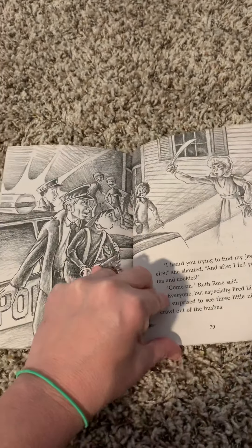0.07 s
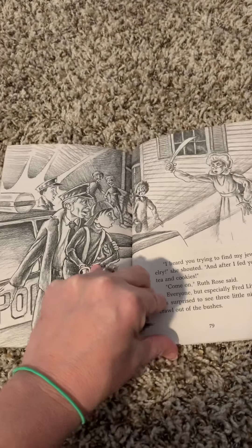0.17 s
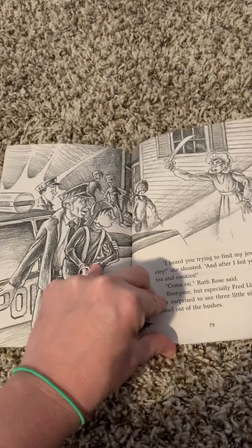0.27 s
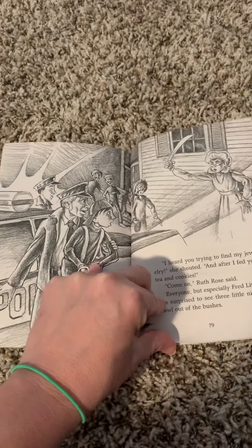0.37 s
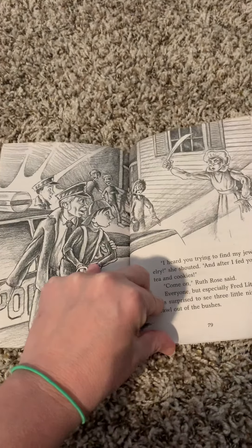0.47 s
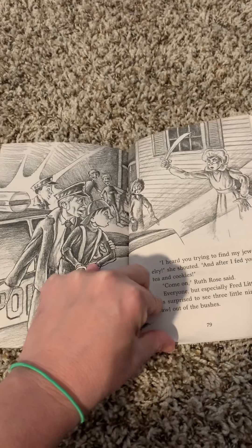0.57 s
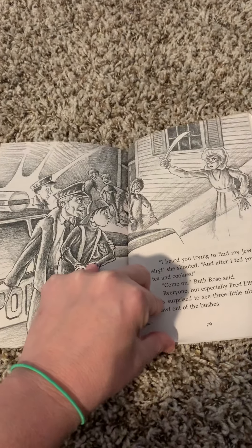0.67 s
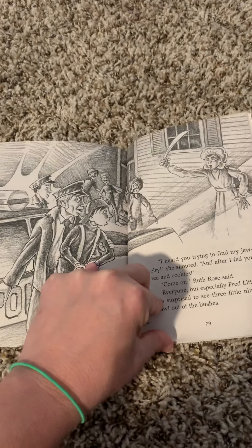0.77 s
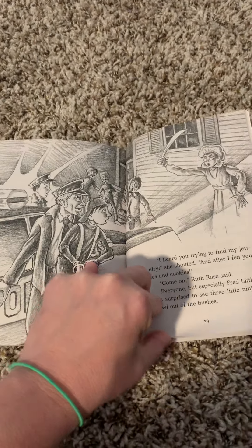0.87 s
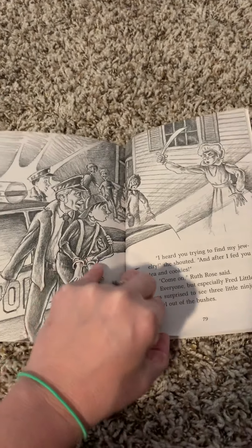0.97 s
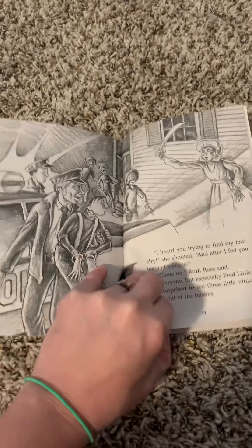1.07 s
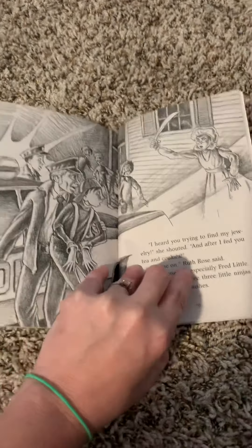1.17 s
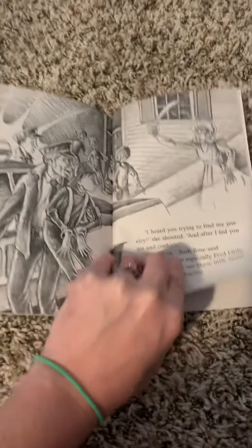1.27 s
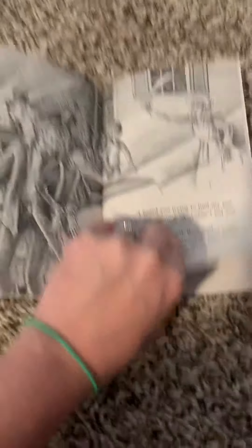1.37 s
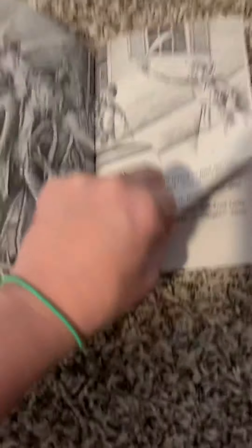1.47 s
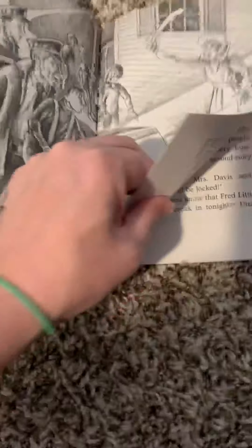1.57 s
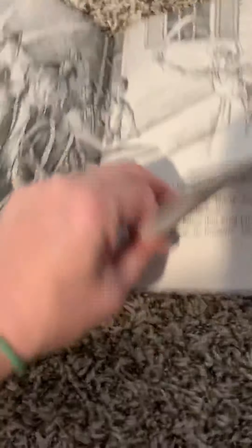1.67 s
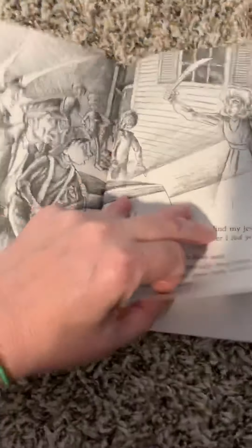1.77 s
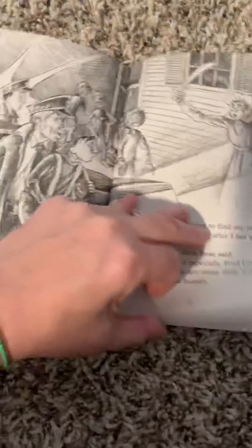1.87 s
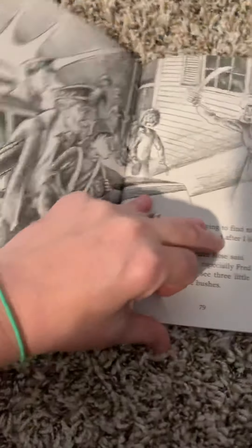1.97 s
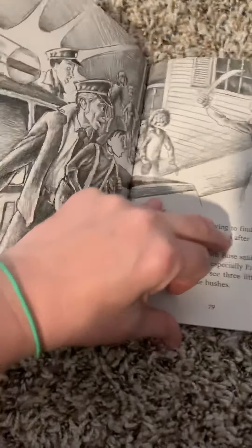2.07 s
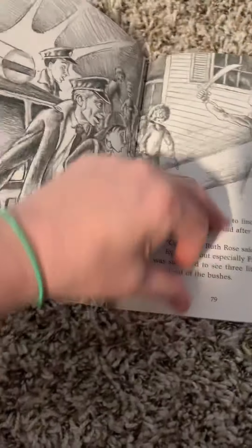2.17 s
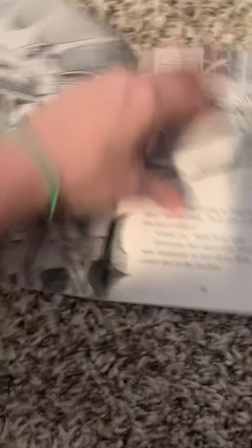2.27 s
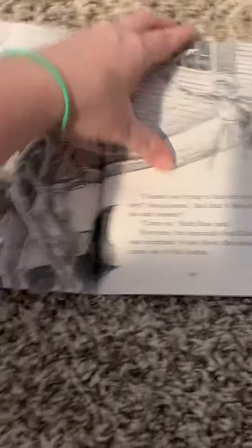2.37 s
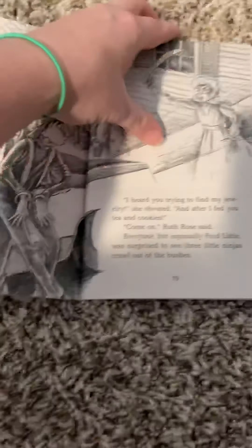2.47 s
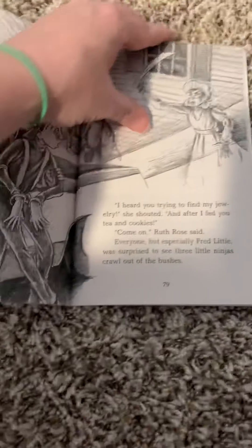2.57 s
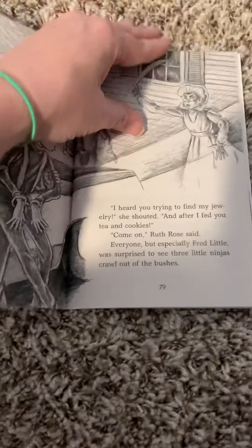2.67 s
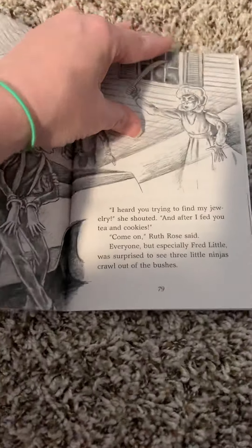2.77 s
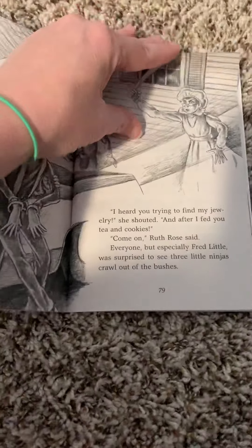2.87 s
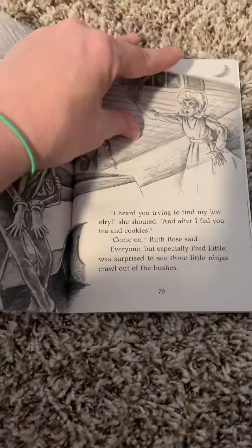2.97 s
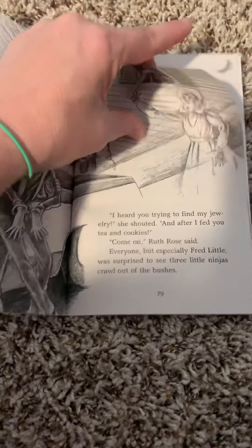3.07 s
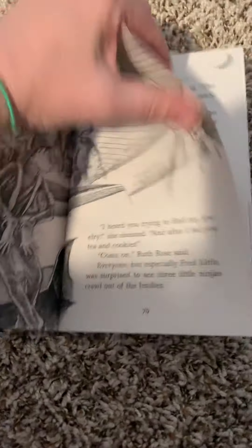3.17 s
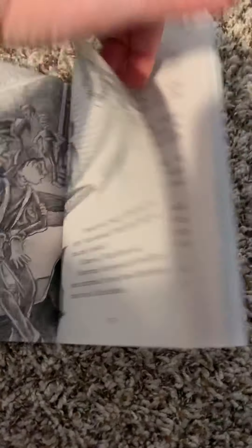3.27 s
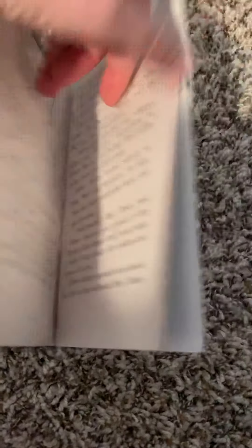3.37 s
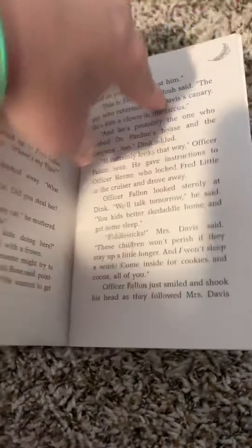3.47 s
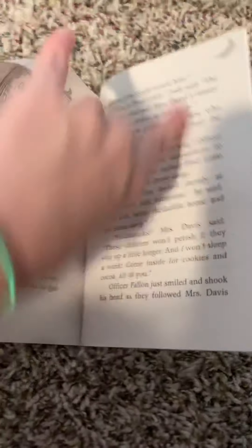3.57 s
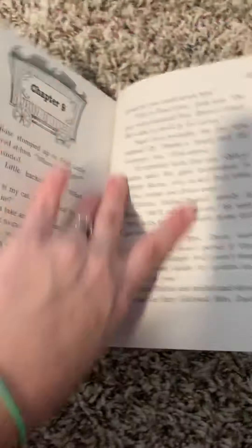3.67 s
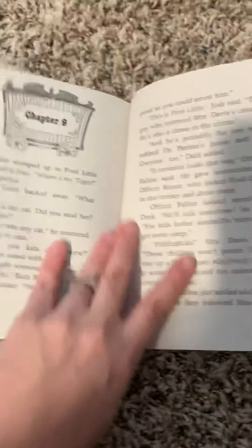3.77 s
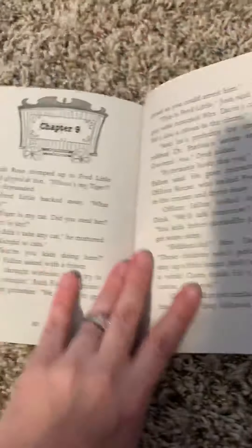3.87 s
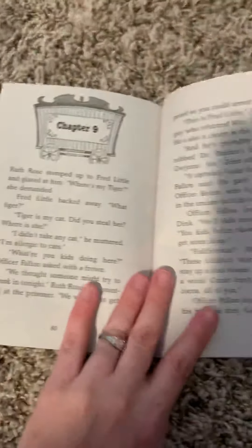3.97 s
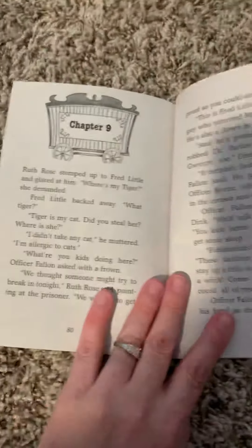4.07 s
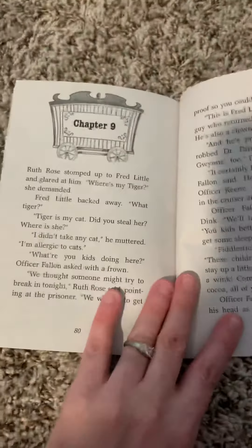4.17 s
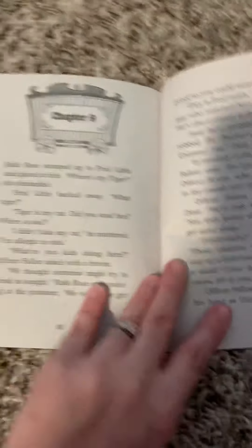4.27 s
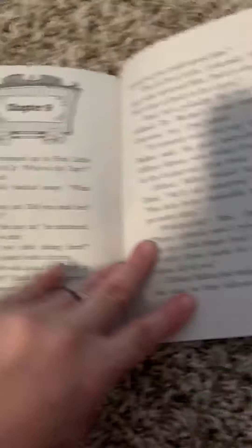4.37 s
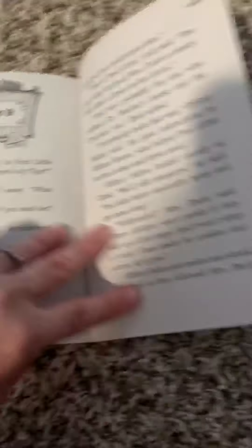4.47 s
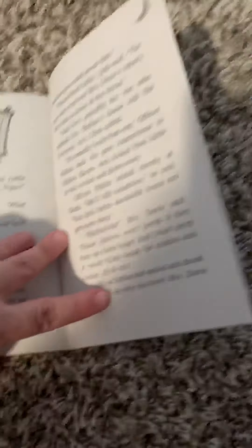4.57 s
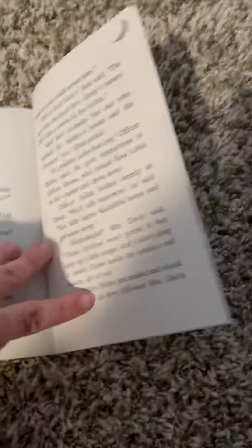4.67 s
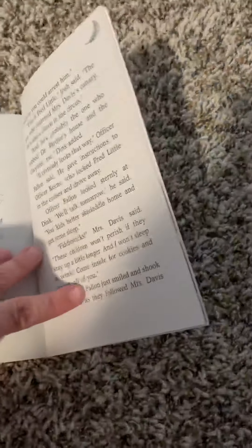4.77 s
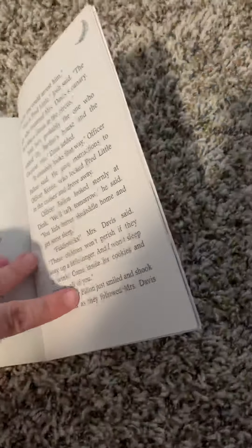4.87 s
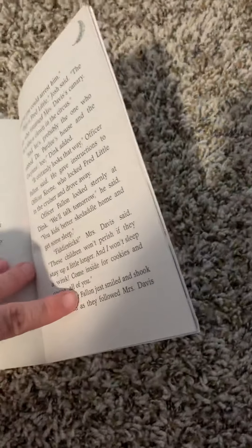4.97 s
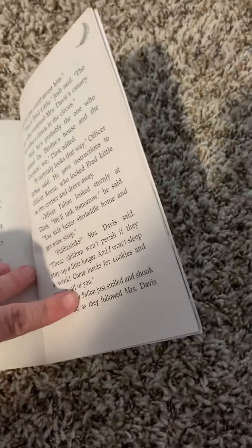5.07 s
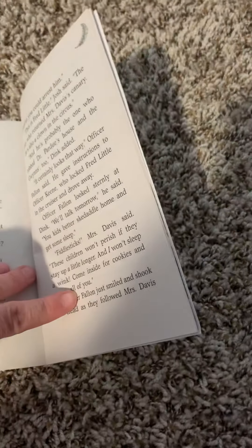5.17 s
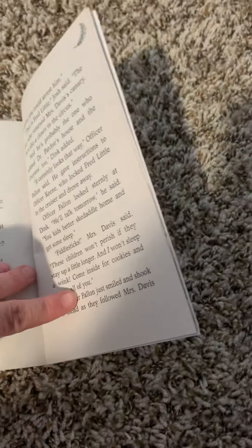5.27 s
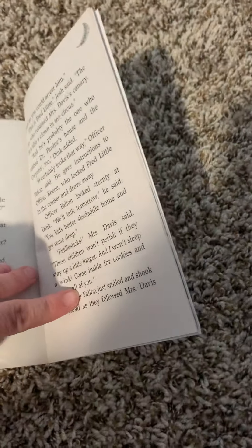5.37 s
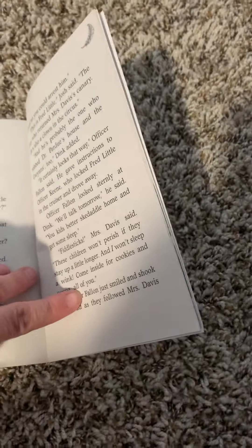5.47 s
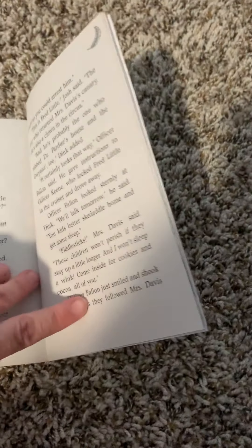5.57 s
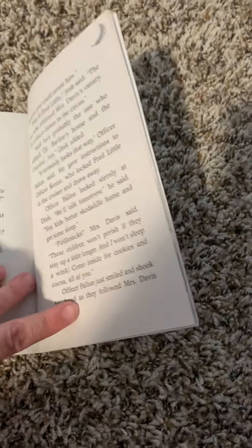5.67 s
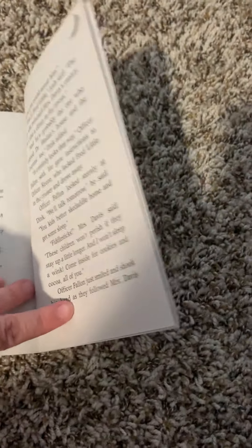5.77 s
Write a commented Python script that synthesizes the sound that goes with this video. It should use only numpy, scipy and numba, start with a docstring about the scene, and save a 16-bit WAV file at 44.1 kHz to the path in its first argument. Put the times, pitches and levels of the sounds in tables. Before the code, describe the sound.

Close, dry handling of a paperback on carpet, nearly mono with slight width, over a very quiet room with faint low rumble. In the first 0.4 s there is soft fingertip hiss and small crackles, with one thin bright tick at about 0.35, then near silence. From 0.9 s rubbing returns, rising through 1.1-1.5 with scratchy rustles, dull pops and a soft bump. Steady papery sliding continues to a hard, sharp snap at about 2.17, followed by a low flap and hissing swish. Brittle ticks come around 2.6. Between 3.1 and 3.25 a page turn crackles densely with sharp snaps, hollow pops and a muffled thump; coarse rustling and air flutter carry on to about 3.8. It then thins, with light brushing at 4.3-4.6 and sparse tiny ticks near 5. A final soft rub with small cracks and pops swells at 5.4-5.8.

```python
"""A paperback handled on a carpet in a quiet, low-rumbling room, heard from close by, mono widened to stereo.
Fingertips hiss softly at first as grains of noise; bending sheets rustle in coarser grains, moved air flutters.
Creases crack as short rough rings, sheets pop as duller ones; after a second the book thumps on the carpet.
The handling is loudest from about 2 to 4 s, with the hardest cracks near 2.17 s, then it gets quieter.
A last rub, with a few cracks and pops, swells between 5.4 and 5.8 s."""
import sys
import numpy as np
from scipy import signal
from scipy.fft import rfft, irfft
from scipy.io import wavfile
from scipy.ndimage import uniform_filter1d
from numba import njit

SR = 44100
rng = np.random.default_rng(int(sys.argv[2]) if len(sys.argv) > 2 else 0)


def transcribe(u):
    """Save the signal u as a 16-bit wav file named by the first command-line argument.

    u: samples, shape (n,) or (channels, n), limited to [-1, 1]; the rate is SR.
    q: integer samples, one column per channel.
    """
    v = np.clip(np.atleast_2d(u).T, -1, 1)
    q = np.round(v * 32767).astype(np.int16)
    wavfile.write(sys.argv[1], SR, q)


N = 256662


def undb(db):
    """Amplitude factor of a level in dB."""
    return 10 ** (np.asarray(db) / 20)


def unit(x):
    """Scale to an RMS of 1."""
    return x / np.sqrt(np.mean(x ** 2))


@njit
def svf(x, hz, width):
    """State-variable band-pass whose centre can move every sample; width is a share of the centre."""
    out, band, low = np.empty(len(x)), 0., 0.
    for i in range(len(x)):
        g = np.tan(np.pi * hz[i] / SR)
        v = (band + g * (x[i] - low)) / (1 + g * (g + width))
        band, low = 2 * v - band, low + 2 * g * v
        out[i] = width * v
    return out


def colour(x, points):
    """Shape the spectrum through (f/Hz, level/dB) points, steeply closed outside them."""
    hz, db = np.transpose(points)
    f = np.arange(N // 2 + 1) * SR / N + 1  # 1 Hz up, so that the log exists
    gain_db = np.interp(np.log(f), np.log(hz), db, -60, -60)
    return irfft(rfft(x) * undb(gain_db), N)


def walk(rate):
    """Wandering level: random values, rate of them per second, each held and then smoothed twice."""
    hold = int(SR / rate)
    steps = np.repeat(rng.standard_normal(N // hold + 1), hold)
    smooth = uniform_filter1d(uniform_filter1d(steps, hold), hold)
    return 0.91 * smooth[:N]


def room():
    """Hush of the room: noise with a low rumble, its level wavering gently."""
    # spectrum of the hush, relative: f/Hz, level/dB per Hz
    hush = [(30, -9), (55, 22), (80, -13), (130, -10.5), (250, -25), (500, -37.5), (1300, -33), (3000, -10),
            (6000, -23.5), (15000, -16)]
    level_db = -77 + 1.5 * walk(3.4)
    return unit(colour(rng.standard_normal(N), hush)) * undb(level_db)


def strokes(column, time_scale, rest_db):
    """Level and tilt of one layer: swells rise and fade evenly in dB; the loudest weighs most in the tilt."""
    # swells of rubbing and bending, some overlapping to shape one longer stroke:
    # peak t/s, rise t/s, fall t/s (before time_scale),
    # level/dB of hiss, rustle, air, then tilt/dB per octave of hiss, rustle
    swells = [(0.0, .1, 0.26, -60, -67, -76, -4.5, -2), (0.096, 0.16, 0.18, -63.5, -60, -67.5, -5, -8.5),
              (0.168, 0.017, 0.11, -65, -57.5, -62, -3, -14),
              (0.204, 0.055, 0.24, -60, -64.5, -66.5, -9.5, 1),
              (0.343, 0.074, 0.059, -53, -60.5, -65, -1.5, -5),
              (0.385, 0.2, 0.066, -70.5, -68.5, -69, -4, 0), (0.58, 0.089, 0.22, -77.5, -91, -74.5, 2, -6),
              (0.862, 0.12, 0.075, -71.5, -67, -72, -11, -5.5),
              (0.941, 0.032, 0.96, -56.5, -62.5, -74, -2, -3),
              (1.066, 0.23, 0.16, -52.5, -64.5, -73, 3.5, -5),
              (1.123, 0.034, 0.063, -45.5, -44, -67.5, -2.5, -4),
              (1.203, .06, 0.11, -58, -57.5, -75, 1, -4.5), (1.263, 0.022, .1, -42.5, -54, -85, 1.5, 1),
              (1.287, 0.036, 0.078, -35.5, -54.5, -85, -3.5, -2.5),
              (1.415, 0.17, 0.095, -38.5, -49, -63, 1, -2.5),
              (1.455, 0.06, 0.16, -40.5, -50.5, -54.5, 0, 2),
              (1.702, 0.33, 0.26, -38, -45.5, -62, -3.5, 5.5), (1.805, 0.32, 0.16, -37, -56.5, -65, 2, -9),
              (1.901, 0.045, 0.081, -40.5, -47, -53, -2, 1), (2.05, 0.25, 0.9, -60, -63.5, -72.5, -10, -1),
              (2.158, 0.039, 0.072, -31, -52, -59.5, -0.5, -8.5),
              (2.266, 0.18, 0.46, -35, -49, -57.5, 6, 0), (2.319, 0.052, 0.11, -100, -70, -53, 15.5, -3),
              (2.619, 0.12, 0.15, -38.5, -50, -60.5, 4.5, 3), (2.7, .2, 0.097, -51.5, -67, -86, 3.5, 9),
              (2.816, 0.043, 0.1, -45.5, -51.5, -59.5, -0.5, -2),
              (2.871, 0.27, 0.036, -50, -59, -69, 2.5, 2), (2.93, 0.02, 0.061, -35, -44.5, -58, -4, 1.5),
              (3.0, 0.19, .4, -55, -66, -74.5, 1, 3), (3.114, 0.061, 0.095, -32, -44, -56.5, -3, 2),
              (3.164, 0.0205, 0.052, -31.5, -40, -53, 1.5, 0.5), (3.188, .03, 0.026, -31, -37.5, -53, 3, 3),
              (3.225, 0.071, 0.084, -28, -37.5, -60, -5, 8.5), (3.31, 0.32, 0.46, -34, -51.5, -57.5, 0, 3),
              (3.458, 0.18, 0.13, -37, -43, -52.5, -6.5, 3), (3.55, 0.17, 0.9, -50, -57.5, -66.5, -5, 7),
              (3.651, 0.075, 0.27, -39, -43.5, -52.5, 2.5, .5),
              (3.752, 0.095, .08, -37, -40.5, -47.5, -0.5, 5.5),
              (3.87, 0.9, 0.24, -43.5, -61.5, -64, 6, -2.5), (4.05, 0.49, 0.11, -57, -70, -78, -2, 0.5),
              (4.22, 0.12, .2, -74.5, -73.5, -72, -3, -4.5),
              (4.3, 0.072, 0.47, -51.5, -60.5, -74, 5.5, -3.5), (4.429, 0.16, 0.28, -43.5, -57, -65, 4, 8),
              (4.516, 0.18, 0.067, -42, -61.5, -88, 8, -2),
              (4.715, 0.13, 0.13, -54, -63.5, -72.5, -0.5, 4.5),
              (4.762, .15, .025, -55.5, -70.5, -77, 0.5, 2.5),
              (4.861, 0.36, 0.49, -62.5, -71.5, -82.5, -5.5, 13),
              (4.974, 0.24, 0.049, -58, -71, -89.5, -0.5, 1),
              (5.117, 0.11, 0.021, -68, -81.5, -80, 5.5, 6.5),
              (5.183, 0.03, 0.039, -59.5, -68, -78, -1.5, 13), (5.237, .02, .06, -63.5, -71, -83, -2, 1),
              (5.37, 0.26, 0.18, -65.5, -70, -99, -4, 8), (5.444, .035, 0.14, -44.5, -55, -76, -2.5, 4),
              (5.49, 0.13, 0.041, -50, -58.5, -78, -2, 0), (5.545, .022, 0.08, -40.5, -48.5, -74, -3, 3.5),
              (5.575, 0.081, 0.02, -43.5, -56, -68, -2, -0.5),
              (5.605, 0.025, 0.053, -52, -55.5, -61, -2, 7), (5.663, .07, 0.2, -49.5, -61.5, -73, 0, 1.5),
              (5.8, 0.14, 0.27, -48, -56.5, -70.5, -1, 2)]
    swell_db = 24  # climbed over the scaled rise, dropped over the scaled fall
    rows = np.array(swells)[:, :, None]
    t = np.arange(0, N / SR, .001)
    after = t - rows[:, 0]
    swell_s = time_scale * np.where(after < 0, rows[:, 1], rows[:, 2])
    power = undb(rows[:, 3 + column] - swell_db * np.abs(after) / swell_s) ** 2
    total = power.sum(axis=0) + undb(rest_db) ** 2
    level_db = 10 * np.log10(total)
    tilt_db = 0 * t  # the air is never tilted
    if column < 2:
        tilt_db = (power * rows[:, 6 + column]).sum(axis=0) / total
    return [np.interp(np.arange(N) / SR, t, curve) for curve in (level_db, tilt_db)]


def patch(x, hz, spacing, flicker_db, rate):
    """One band of grains, cross-faded into its neighbours, whose level flickers on its own."""
    f = np.arange(N // 2 + 1) * SR / N + 1
    away = np.log2(f / hz) / spacing
    fade = np.cos(np.pi / 2 * np.clip(away, -1, 1))
    return unit(irfft(rfft(x) * fade, N)) * undb(flicker_db * walk(rate))


def hopping(x, hz, drift, width, rate):
    """A narrow resonance that hops at random to new pitches, giving the noise a faint changing tone."""
    hops = np.cumsum(rng.random(N) < rate / SR)
    octaves = drift * rng.uniform(-0.92, 1, N)[hops]
    return unit(svf(x, np.minimum(hz * 2 ** octaves, .4 * SR), width))


def rub(level_db, tilt_db, bands, scatter_db, surge_db, patch_db, rate, tone_db):
    """Fibres catch and let go in a dense rain of clicks, a few much bigger, in bands with hopping tones."""
    octaves = np.log2(np.array(bands)[:, 0])
    spacing = np.diff(octaves).max()
    # the bands surge together, but each flickers alone
    sizes = undb(scatter_db * rng.exponential(size=N) + surge_db * walk(2 * rate))
    out, power = 0, 0
    for (hz, db), away in zip(bands, octaves - octaves.mean()):
        gain = undb(db + tilt_db * away)
        grains = sizes * rng.standard_normal(N)
        band = patch(grains, hz, spacing, patch_db, rate)
        tone = hopping(band, hz, drift=0.178, width=0.013, rate=35.)
        out = out + gain * (band + undb(tone_db) * tone)
        power = power + gain ** 2
    # the tilt changes the colour, not the level
    return unit(out / np.sqrt(power)) * undb(level_db)


def fingertips():
    """Skin and page edges drag over the paper: the bright, fine hiss."""
    # usual colour of the sliding hiss: f/Hz, level/dB
    skin = [(2900, -4), (3450, -2), (4110, 1), (4890, 0.9), (5820, 5), (6920, 3.5), (8240, 3.5), (9800, 6),
            (11660, 3.5), (13880, 2.5)]
    level_db, tilt_db = strokes(column=0, time_scale=0.83, rest_db=-86.5)
    return rub(level_db, tilt_db, skin, scatter_db=2.29, surge_db=1.0, patch_db=4.3, rate=35, tone_db=-4)


def sheets():
    """Bending sheets crumple in coarser grains, lower than the hiss."""
    # usual colour of bending sheets: f/Hz, level/dB
    paper = [(480, -5), (600, -1), (760, 3.2), (960, 5.5), (1210, 5), (1520, 7), (1920, 4.5), (2420, 2.5)]
    level_db, tilt_db = strokes(column=1, time_scale=0.81, rest_db=-84)
    return rub(level_db, tilt_db, paper, scatter_db=3.31, surge_db=2.77, patch_db=2.46, rate=35, tone_db=-5)


def air():
    """Low flutter of air pushed by the moving pages."""
    # usual colour of the flutter: f/Hz, level/dB
    puff = [(50, -5.5), (70, -0.5), (100, -1.5), (140, 0), (200, -0.5), (290, 1.86), (410, 0.5)]
    level_db, tilt_db = strokes(column=2, time_scale=0.73, rest_db=-83)
    return rub(level_db, tilt_db, puff, scatter_db=3.33, surge_db=3.9, patch_db=4.9, rate=16, tone_db=-12)


def ring(hz, t60, rise_s, noisy, broad):
    """One short knock, peak 1: a swell, then a damped mode roughened by noise around it and a broad snap."""
    t = np.arange(4096) / SR
    white = rng.standard_normal(4096)
    rise = np.minimum(t / max(rise_s, 1e-4), 1) ** 2
    decay = 1000 ** (-np.maximum(t - rise_s, 0) / max(t60, .002))  # 60 dB down after t60
    rough = unit(svf(white, hz + 0 * t, 0.52))
    knock = rise * decay * (np.sin(2 * np.pi * hz * t) + noisy * rough + broad * white)
    return knock / np.abs(knock).max()


def add(track, start_s, sound):
    """Lay a sound into the track, cut at its end."""
    i = int(start_s * SR)
    track[i:i + len(sound)] += sound[:N - i]


def low_cut(x, hz):
    """Take away the bass below hz, so that the knocks stay dry."""
    return signal.sosfilt(signal.butter(2, hz, "high", fs=SR, output="sos"), x)


def cracks():
    """Creases crack: thin, broad and rough knocks that swell before they ring."""
    # creases: end of the rise t/s, peak level/dB ahead of the low cut, ring f/Hz, t60/s
    creases = [(0.093, -43.5, 6030, 0.037), (0.1334, -51, 6500, .007), (0.164, -50, 5950, 0.014),
               (0.1998, -40, 6670, 0.011), (0.2116, -40, 6170, 0.0037), (0.3371, -36, 9860, 0.011),
               (0.346, -24, 15800, 0.0062), (0.353, -34, 14900, .008), (0.3849, -43, 14900, 0.0065),
               (0.928, -48, 6540, 0.013), (1.118, -33, 7840, .02), (1.128, -39, 5000, 0.019),
               (1.453, -37, 2640, 0.011), (1.887, -25, 3500, 0.015), (1.911, -29, 5200, 0.029),
               (2.1023, -42.5, 8400, 0.0057), (2.1408, -30.5, 4300, 0.0094), (2.1525, -21, 4200, 0.019),
               (2.1583, -16.5, 11900, 0.0057), (2.1628, -40, 9600, .007), (2.167, -18, 7000, 0.0046),
               (2.171, -9.5, 6270, 0.0051), (2.1743, -8, 6920, .007), (2.604, -22, 11400, .012),
               (2.6163, -23, 11900, 0.0046), (2.624, -29, 10700, .018), (2.6337, -19, 11270, 0.011),
               (2.804, -37.5, 11200, 0.011), (2.931, -28, 10700, 0.051), (3.113, -30, 5500, 0.0083),
               (3.153, -23, 9100, 0.009), (3.1635, -18.5, 8750, 0.037), (3.183, -20, 8350, 0.01),
               (3.1883, -13.5, 9600, 0.015), (3.1999, -35, 4850, 0.0063), (3.226, -25, 5550, 0.026),
               (3.2312, -10, 3890, .011), (3.338, -21.5, 9970, .03), (3.365, -29, 6100, 0.0077),
               (3.486, -23, 4340, 0.017), (3.6214, -28, 4680, 0.013), (3.6535, -35.5, 5600, 0.0043),
               (4.6128, -40, 8000, 0.02), (4.7597, -44, 7950, .018), (4.836, -49, 5660, 0.011),
               (4.969, -42, 5650, 0.01), (5.1136, -56, 5580, 0.023), (5.1793, -48, 5200, .01),
               (5.2361, -40, 5370, 0.0033), (5.429, -40, 6400, .01), (5.607, -33.5, 7300, 0.018)]
    track = np.zeros(N)
    for s, db, hz, t60 in creases:
        rise_s = 0.35 * t60
        add(track, s - rise_s, undb(db) * ring(hz, t60, rise_s, noisy=4.0, broad=0.25))
    return low_cut(track, 1300)


def pops():
    """Sheets buckle with a short dull pop, less rough than a crack."""
    # popping sheets: start t/s, peak level/dB ahead of the low cut, ring f/Hz
    popping = [(0.161, -54, 856), (0.176, -49, 790), (0.227, -46.5, 760), (1.1151, -33, 785),
               (1.1276, -31, 850), (1.1956, -43.5, 815), (1.268, -42, 1140), (1.4485, -39, 785),
               (1.6386, -36, 1760), (1.7022, -37, 1800), (1.8864, -29, 794), (1.8952, -40.5, 590),
               (2.174, -28, 1044), (2.2471, -28, 1330), (2.2718, -36, 1330), (2.3104, -35, 1390),
               (2.6026, -56, 1110), (2.635, -32.5, 1000), (2.803, -36.5, 926), (2.932, -41, 1400),
               (3.1102, -29.5, 1670), (3.1626, -23.5, 1116), (3.183, -24.5, 810), (3.1893, -15, 1635),
               (3.2039, -20.5, 1497), (3.227, -30, 2090), (3.3206, -50, 1410), (3.336, -33, 1590),
               (3.486, -31, 1330), (3.639, -31, 1260), (3.73, -34, 1100), (3.7562, -29, 1485),
               (3.8734, -38, 1380), (4.4192, -41.5, 523), (4.969, -60, 900), (5.235, -56, 900),
               (5.5426, -38, 1180), (5.6058, -46, 850), (5.7217, -41.5, 1030), (5.7581, -44.5, 1830)]
    track = np.zeros(N)
    for s, db, hz in popping:
        add(track, s, undb(db) * ring(hz, t60=0.023, rise_s=.0012, noisy=0.4, broad=0.51))
    return low_cut(track, 250)


def thumps():
    """The book flaps and thumps on the carpet: dull knocks, the low ones ringing longer."""
    # flaps and thumps: start t/s, peak level/dB ahead of the low cut, ring f/Hz
    flaps = [(1.136, -48.5, 427), (1.4084, -46.5, 343), (1.449, -34.5, 283), (1.5946, -51.5, 265),
             (1.8817, -35, 438), (1.923, -49.5, 293), (2.1721, -38.5, 266), (2.323, -34.5, 64),
             (2.8037, -49.5, 226), (2.9389, -45.5, 443), (3.1569, -34.5, 238), (3.19, -34, 258),
             (3.2003, -29.5, 78), (3.237, -39, 108), (3.4155, -48, 173), (3.6406, -44.5, 422),
             (3.6633, -47, 138), (3.7362, -45, 85), (3.8728, -63, 118), (5.434, -62, 297),
             (5.5769, -56, 370), (5.6076, -57, 222)]
    track = np.zeros(N)
    for s, db, hz in flaps:
        t60 = 0.026 + 5.9 / hz  # a fixed time plus a few cycles
        add(track, s, undb(db) * ring(hz, t60, rise_s=0.00353, noisy=0.62, broad=0.038))
    return low_cut(track, 45)


def scene():
    """Most of the sound is common to both channels; separate noise enters them with opposite signs."""
    shared = room() + fingertips() + sheets() + air() + cracks() + pops() + thumps()
    sides = undb(-28.5) * room() + undb(-40.5) * fingertips() + undb(-9) * sheets() + undb(-6.5) * air()
    return shared + sides * np.array([[1], [-1]])


def record(dry):
    """A mostly mono sound widened: the right channel differs in phase and level, its treble late; top cut."""
    # right channel against left: f/Hz, phase lead/rad, level/dB (level equal above the last row)
    widening = [(0, 0, 1), (200, .07, 1), (700, .5, 3.5), (1200, .3, .5), (1720, 0, .2), (2240, -1.1, 1),
                (2760, -2.0, 1), (3270, -1.4, .6), (3800, -1.85, .3)]
    lag_s, lag_from_hz, top_hz = .0002335, 2550, 15800
    f = np.arange(N // 2 + 1) * SR / N
    hz, lead, db = np.transpose(widening)
    late = -2 * np.pi * lag_s * (f - lag_from_hz)
    phase = np.where(f < hz[-1], np.interp(f, hz, lead), late)
    response = undb(np.interp(f, hz, db, right=0)) * np.exp(1j * phase)
    stereo = [dry[0], irfft(rfft(dry[1]) * response, N)]
    return signal.sosfilt(signal.ellip(10, .2, 60, top_hz, fs=SR, output="sos"), stereo)


dry = scene()
out = record(dry)
transcribe(out)
```